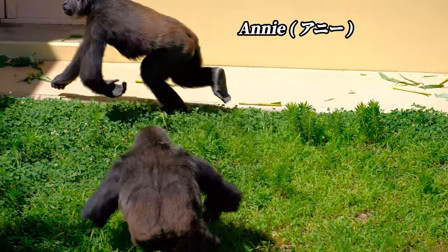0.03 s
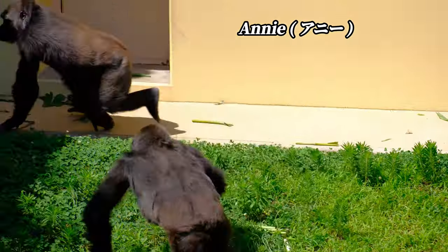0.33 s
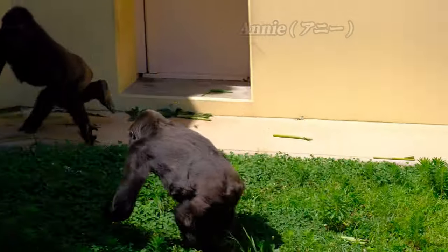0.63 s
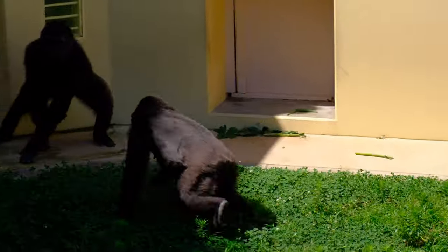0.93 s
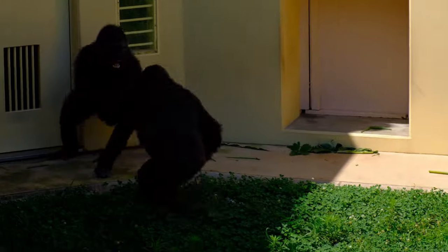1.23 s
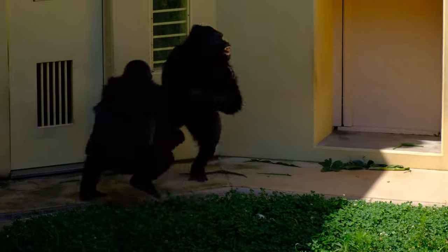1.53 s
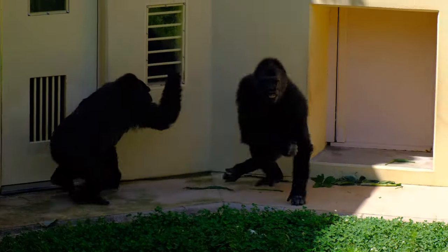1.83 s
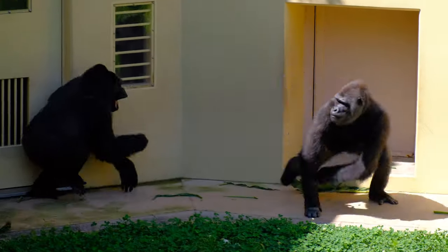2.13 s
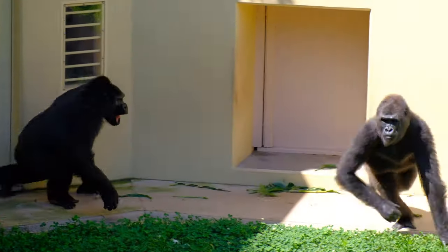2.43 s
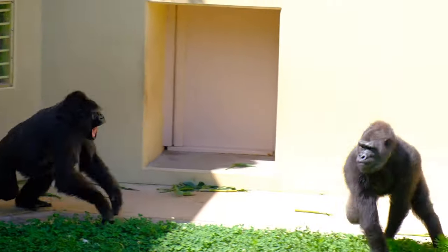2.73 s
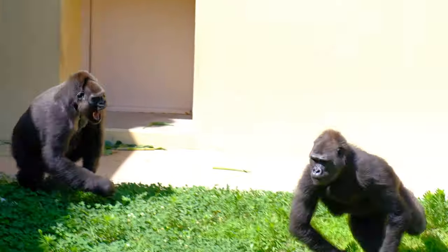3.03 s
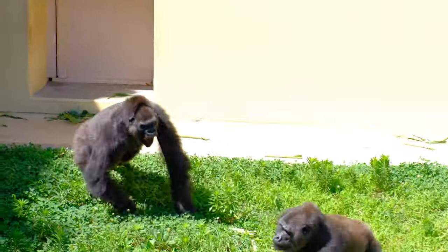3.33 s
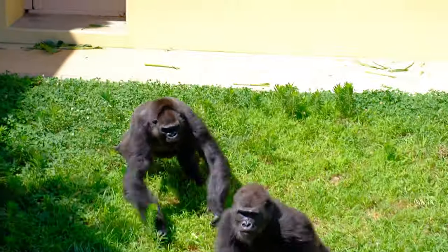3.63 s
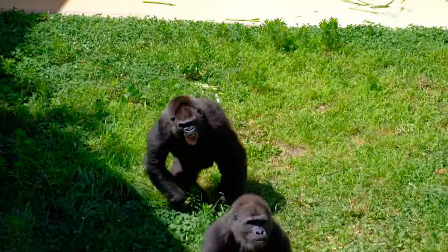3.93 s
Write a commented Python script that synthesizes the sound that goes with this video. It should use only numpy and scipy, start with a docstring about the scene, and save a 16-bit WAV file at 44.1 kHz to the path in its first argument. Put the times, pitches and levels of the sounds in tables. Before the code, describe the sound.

Rapid, raspy gorilla barks with a squealing edge and brief hoots ring off the walls of an outdoor enclosure, the loudest slightly distorting. Beneath them, feet thud faintly on the ground and insects hiss steadily.

```python
"""A gorilla's hoarse, screaming barks, nearly three a second, as it chases another across a walled zoo yard.
Chaotic vocal folds drive the resonances of throat and mouth: a low hoot through half-closed lips
bursts into a rasp with a squeal riding on it. The walls reverberate and the peaks overload the microphone.
Feet thud softly on the ground and insects hiss throughout."""
import sys
import numpy as np
from scipy import signal
from scipy.fft import rfft, irfft
from scipy.io import wavfile
from scipy.ndimage import uniform_filter1d

SR = 44100
rng = np.random.default_rng(int(sys.argv[2]) if len(sys.argv) > 2 else 0)


def inscribe(sig):
    """Save sig as 16-bit PCM at rate SR to the path in sys.argv[1].

    A 1-D sig is mono; a 2-D sig holds one channel per row.
    Samples are clipped to [-1, 1] before scaling.
    """
    pcm = np.round(np.clip(np.atleast_2d(sig).T, -1, 1) * 32767)
    wavfile.write(sys.argv[1], SR, pcm.astype(np.int16))


N = 176400
T = np.arange(N) / SR
BIN_HZ = np.maximum(np.arange(N // 2 + 1) * SR / N, 1)


def from_db(db):
    """Amplitude ratio: a factor of ten for every 20 dB."""
    return 10 ** (np.asarray(db) / 20)


def unit_rms(x):
    """Normalisation to a mean power of 1."""
    return x / np.sqrt(np.mean(x ** 2) + 1e-20)


def at_bins(points):
    """Interpolation of (hz, value) points on a log-frequency axis."""
    hz, value = np.transpose(points)
    return np.interp(np.log(BIN_HZ), np.log(hz), value)


def in_time(points):
    """Linear interpolation of (time_s, value) points at every sample."""
    return np.interp(T, *np.transpose(points))


def colour(x, spectrum):
    """Spectral shaping by (hz, gain_db) points; rms 1."""
    return unit_rms(irfft(rfft(x) * from_db(at_bins(spectrum)), N))


def pan(db):
    """Direction by level difference: two gains, the left db above the right."""
    return from_db([[db / 2], [-db / 2]])


def drift(hz):
    """Random fluctuation: noise low-passed at hz; rms 1."""
    return unit_rms(irfft(rfft(rng.standard_normal(N)) / (1 + (BIN_HZ / hz) ** 2), N))


def stereo_noise(coherence):
    """Partial coherence: white noise with one part in phase and one in antiphase between channels."""
    mid, side = rfft(rng.standard_normal((2, N)))
    return irfft(np.sqrt((1 + coherence) / 2) * mid + np.sqrt((1 - coherence) / 2) * side * [[1], [-1]], N)


def resonate(x, hz, width_hz):
    """A resonance with a movable centre, by heterodyning: shift down, low-pass, shift back; rms 1."""
    carrier = np.exp(2j * np.pi * np.cumsum(hz * np.ones(len(x))) / SR)
    lowpass = signal.butter(2, width_hz / 2, fs=SR, output="sos")
    return unit_rms((signal.sosfilt(lowpass, x / carrier) * carrier).real)


def steady(x, samples=900):
    """Division by the running rms holds the level steady."""
    return x / np.sqrt(np.abs(uniform_filter1d(x ** 2, samples)) + 1e-3)


def span(start, length):
    """The samples of a call with 0.15 s either side, and their times from its start."""
    near = np.abs(T - start - length / 2) < length / 2 + .15
    return near, T[near] - start


def envelope(t, length, attack_s, release_s):
    """Exponential growth up to t = 0, a hold for length, then exponential decay."""
    return np.exp(np.minimum(t, 0) / attack_s - np.maximum(t - length, 0) / release_s)


def open_air():
    """Diffuse ambient noise, whose coherence between the channels falls with frequency."""
    # spectrum of the hiss: frequency_hz, gain_db
    spectrum = [(30, -27), (70, -26), (200, -15.5), (400, -13.5), (650, -9.5), (900, 1.5), (1300, 5.5),
                (1800, 3), (2600, -2), (3300, 1.5), (4600, 1), (5700, -4), (8000, -1.5), (10000, -22.5),
                (12000, -67.5), (16000, -7)]
    # left-right likeness: frequency_hz, coherence
    coherence = [(100, 1), (400, 1), (1000, 0.69), (2000, 0.43), (4000, 0.25), (8000, 0.067)]
    return from_db(-26) * colour(stereo_noise(at_bins(coherence)), spectrum) * pan(db=-4.5)


def insects():
    """Band noise near 8.5 kHz, flickering with slight amplitude modulation."""
    # spectrum of the chorus: frequency_hz, gain_db
    spectrum = [(5000, -44), (6800, -16.5), (7700, -2), (8500, 3), (9100, -3), (9900, -13), (10800, -29),
                (14000, -58)]
    level = from_db(-30 - 0.32 * drift(hz=47))
    return level * colour(stereo_noise(coherence=0.4), spectrum)


def yard(x):
    """Reverberation: direct sound, reaching the left first, and a diffuse tail from the walls."""
    # left-right likeness of the tail: frequency_hz, coherence
    coherence = [(300, 1), (1000, 0.73), (2000, 0.34), (4000, 0.62)]
    t60_s, build_up_s, tail_db, right_lag_s = 0.91, .012, -10.5, .00004
    direct = np.array([x[0], np.interp(T - right_lag_s, T, x[1])])
    decay = from_db(-60 * T / t60_s) * (1 - np.exp(-T / build_up_s))
    tail = (stereo_noise(at_bins(coherence)) * decay)[:, :SR]
    tail = tail / np.sqrt(np.sum(tail ** 2) / 2)
    return direct + from_db(tail_db) * signal.fftconvolve(x.mean(axis=0)[None], tail, axes=1)[:, :N]


def footfalls():
    """Damped impacts: feet and knuckles give dull, quickly decaying bursts of noise."""
    # impacts on the ground: start_s, level_db
    steps = [(.097, -39), (0.268, -44), (.355, -47), (0.738, -46), (.8, -52), (1.165, -46), (1.556, -38.5),
             (2.0, -50), (2.438, -42), (3.765, -41)]
    # spectrum of a thud: frequency_hz, gain_db
    thud = [(30, -41), (100, 10.5), (170, -8.5), (280, 4), (500, 4), (2000, -24)]
    level = sum(from_db(db) * envelope(T - start, 0.0047, attack_s=0.0033, release_s=0.042)
                for start, db in steps)
    return level * colour(rng.standard_normal(N), thud)


def vocal_folds():
    """Chaotic oscillation: very uneven pulses, and breath noise gated by each cycle."""
    pitch_hz, jitter, shimmer_db = 292.1, .3, 1.9
    gate_depth, breath_share = 0.52, 0.89
    cycles = np.cumsum(pitch_hz * np.exp(jitter * drift(hz=150))) / SR
    pulses = np.diff(np.floor(cycles), prepend=0) * from_db(shimmer_db * drift(hz=180))
    breath = rng.standard_normal(N) * (1 + gate_depth * np.cos(2 * np.pi * cycles))
    return np.sqrt(1 - breath_share) * unit_rms(pulses) + np.sqrt(breath_share) * unit_rms(breath)


def hoots():
    """Formant filtering: half-closed lips pass the rough voice through two low, narrow resonances."""
    # hoots leading into the barks: start_s, length_s, resonance_hz, lower_level_db, upper_level_db
    calls = [(0.148, 0.1, 499, -28.5, -27.5), (0.458, 0.079, 529, -24, -26), (0.555, 0.089, 636, -24, -38),
             (0.889, 0.016, 477, -48, -20.5), (1.312, 0.02, 485, -34.5, -37),
             (1.638, 0.018, 505, -37, -28.5), (2.05, 0.082, 504, -39.5, -24), (2.4, .08, 515, -29.5, -18),
             (2.689, 0.039, 509, -30, -23.5), (3.079, 0.039, 540, -30, -27), (3.111, 0.015, 790, -11, -20),
             (3.418, 0.064, 513, -27, -31.5), (3.476, 0.028, 520, -18.5, -21.5),
             (3.819, .07, 536, -28, -20.5)]
    upper_ratio, edge_s = 1.72, 0.0082
    source, out = vocal_folds(), np.zeros(N)
    for start, length, hz, lower_db, upper_db in calls:
        near, t = span(start, length)
        lower = from_db(lower_db) * steady(resonate(source[near], hz, width_hz=61))
        upper = from_db(upper_db) * steady(resonate(source[near], hz * upper_ratio, width_hz=170))
        out[near] += envelope(t, length, edge_s, edge_s) * (lower + upper)
    return out


def squeal():
    """A gliding tone, roughened by random frequency and amplitude modulation; rms 1."""
    # pitch contour: time_s, pitch_hz
    contour = [(0, 979), (.16, 792.4), (.21, 902), (.3, 954), (.48, 799.6), (.52, 930), (.66, 956),
               (.89, 810), (.98, 1027), (1.07, 952), (1.31, 872), (1.37, 1080), (1.45, 1134), (1.65, 890),
               (1.69, 985.4), (1.8, 1118), (1.84, 954), (2.08, 960.5), (2.16, 1044), (2.4, 807.4),
               (2.5, 797.6), (2.73, 865), (2.8, 858), (2.85, 950.4), (2.89, 871), (3.11, 793), (3.25, 940),
               (3.39, 960), (3.5, 869), (3.55, 1010), (3.83, 830), (4, 890)]
    jitter, flutter_db = 0.0332, 5
    hz = in_time(contour) * (1 + jitter * drift(hz=120.6))
    return unit_rms(np.sin(2 * np.pi * np.cumsum(hz) / SR) * from_db(flutter_db * drift(hz=74.7)))


def effort():
    """Amplitude modulation of the barks: Gaussian surges of effort and a random shudder."""
    # surges: centre_s, boost_db
    surges = [(.595, 2.5), (1.06, 2), (1.376, 7.5), (2.468, 5), (2.735, 5), (2.78, 3), (2.844, 3.5),
              (3.127, 0), (3.222, 5), (3.854, 2.5), (3.968, 5)]
    half_width_s, shudder_db = 0.012, 1.12
    surge_db = sum(db * np.exp(-((T - centre) / half_width_s) ** 2) for centre, db in surges)
    return from_db(surge_db + shudder_db * drift(hz=26))


def barks():
    """Source and filter: the folds excite throat, chest and mouth; treble comes as the mouth opens."""
    # barks: start_s, length_s, attack_s, level_db, swell_db, squeal_db, mouth_db,
    # snarl_hz, snarl_db, bright_db, pan_db
    calls = [(-.16, 0.17, .017, -12.5, 14, -1, -9, 2700, -26, -10, -6),
             (.204, 0.082, 0.023, -12, -0.5, 2.5, -8.5, 2540, -28, -3.5, 0.5),
             (.518, 0.14, .019, -8, 2, -2.5, -0.5, 2554, -9.5, 3, 0.3),
             (.925, 0.14, 0.021, -8, 1.5, -3, -8, 2125, -13.5, 3.5, -.3),
             (1.341, 0.1, 0.024, -12, 1, 1.5, -1, 1980, -6, 0.5, 0),
             (1.678, .152, 0.0093, -10.5, -1.5, 2.5, -8, 2915, -15, 3, -0.5),
             (2.094, 0.057, .017, -11, -0.5, -3, -7, 3130, -24, -6, -.3),
             (2.417, 0.078, 0.0075, -12, 2.5, -2.5, -15, 2080, -39, -3.5, -0.7),
             (2.727, .15, 0.0098, -9, 0.5, 1, -0.5, 2353, -18, 0, 0.8),
             (3.117, 0.12, 0.013, -8, 0.5, -8, -2, 1268, -12.5, -3, 1.1),
             (3.335, 0.047, 0.015, -21.5, 0, 0, 3.5, 2205, -18, -3, 0),
             (3.499, 0.054, 0.019, -6.5, 1, -4, -6, 3930, -15, -3, 0.5),
             (3.846, 0.2, 0.016, -6, 2, -8, -8.5, 4150, -18, -3.5, 0.5)]
    # spectrum of the rasp: frequency_hz, gain_db
    throat = [(120, -44), (280, -35), (400, -19.5), (520, -15.5), (680, -10), (850, -5.5), (1130, 0.5),
              (1350, -3.5), (1800, -0.5), (2400, -5), (3000, -10.5), (3600, -14), (4400, -18),
              (5500, -25.5), (9000, -43)]
    # mouth resonance, following jaw and lips: time_s, resonance_hz
    formant = [(.2, 1480), (.3, 1580), (.52, 1750), (.58, 2010), (.66, 1770), (.93, 1527), (1.07, 1694),
               (1.35, 1460), (1.45, 1420), (1.69, 1930), (1.83, 1950), (2.09, 1540), (2.48, 1630),
               (2.73, 1629), (2.81, 1806), (2.88, 1657), (3.12, 1715), (3.18, 1740), (3.23, 1983),
               (3.36, 1850), (3.52, 1667), (3.85, 1727), (4, 1970)]
    crossover_hz, snarl_q, open_delay_s = 1620, 6, 0.031
    source, out = vocal_folds(), np.zeros((2, N))
    rasp = steady(colour(source, throat))
    bright = irfft(rfft(rasp) / (1 + (crossover_hz / BIN_HZ) ** 6), N)
    chest = from_db(-31.5) * resonate(source, hz=306, width_hz=81)
    body = rasp - bright + chest
    tone = squeal()
    wander = 1 + 0.043 * drift(hz=45)  # moves the mouth and snarl resonances together
    mouth = steady(resonate(source, in_time(formant) * wander, width_hz=167))
    for (start, length, attack, level_db, swell_db, squeal_db, mouth_db,
         snarl_hz, snarl_db, bright_db, pan_db) in calls:
        near, t = span(start, length)
        snarl = steady(resonate(source[near], snarl_hz * wander[near], snarl_hz / snarl_q))
        opening = envelope(t - open_delay_s, length - open_delay_s, attack_s=0.037, release_s=0.011)
        treble = (from_db(bright_db) * bright[near] + from_db(mouth_db) * mouth[near]
                  + from_db(snarl_db) * snarl)
        voice = steady(body[near] + from_db(squeal_db) * tone[near] + opening * treble, samples=450)
        progress = np.clip(t / length, 0, 1)
        level = from_db(level_db + swell_db * (progress - 1.5))
        out[:, near] += pan(pan_db) * level * envelope(t, length, attack, release_s=0.019) * voice
    return out * effort()


def scene():
    """Superposition: the high-passed voice and the footfalls ring in the yard, over air and insects."""
    bass_cut = signal.butter(4, 193, "high", fs=SR, output="sos")
    voice = signal.sosfilt(bass_cut, barks() + hoots())
    return yard(voice + footfalls()) + open_air() + insects()


def record(dry):
    """Overload and band limiting: peaks clip at full scale, and a low-pass stops the highest treble."""
    stop_hz = 16100
    lowpass = signal.cheby2(12, 60, stop_hz, fs=SR, output="sos")
    return signal.sosfilt(lowpass, np.clip(dry, -1, 1))


dry = scene()
out = record(dry)
inscribe(out)
```